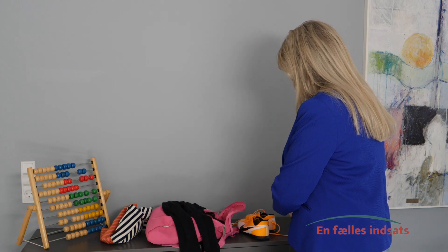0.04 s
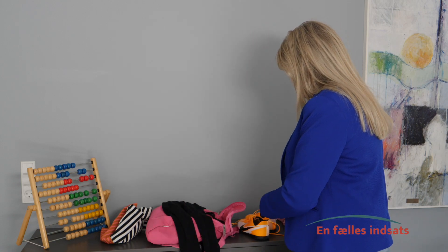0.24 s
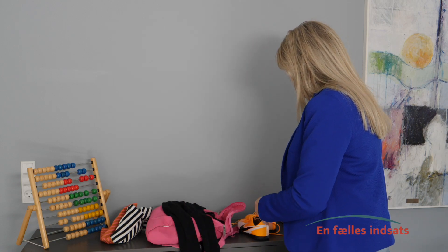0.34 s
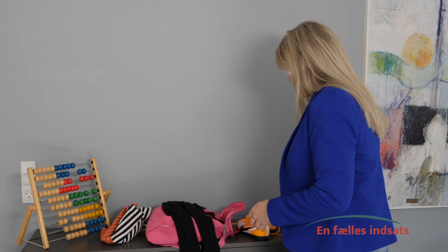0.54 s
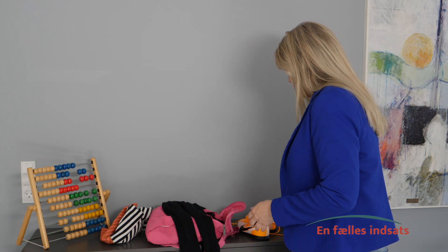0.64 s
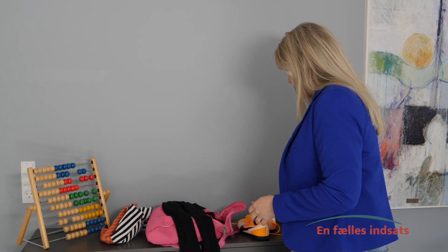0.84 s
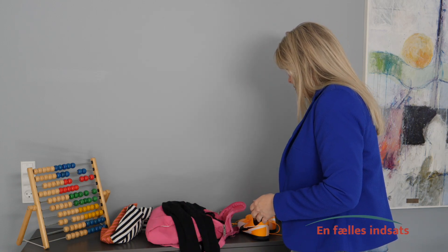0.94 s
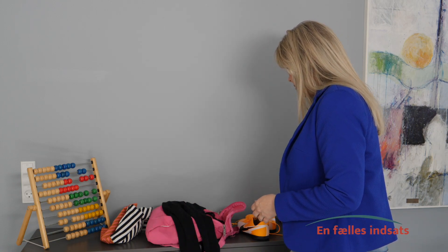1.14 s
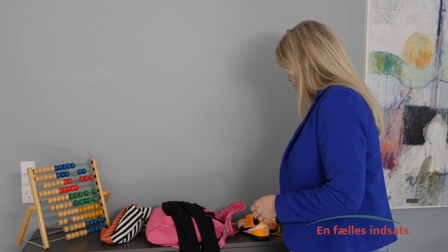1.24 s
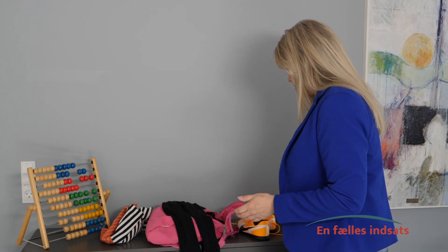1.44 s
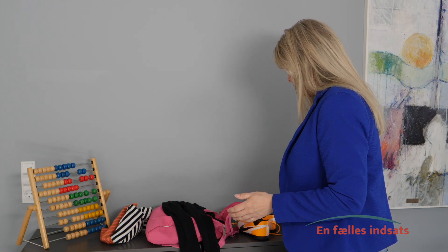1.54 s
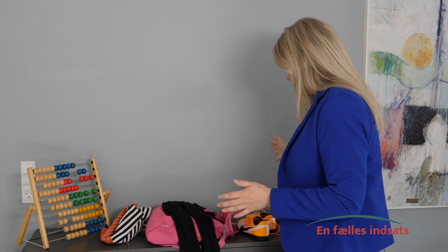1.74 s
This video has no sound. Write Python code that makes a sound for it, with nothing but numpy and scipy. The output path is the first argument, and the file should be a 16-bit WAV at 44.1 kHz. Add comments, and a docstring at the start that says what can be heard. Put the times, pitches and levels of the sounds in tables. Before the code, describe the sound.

Small shoes are put down on a wooden table: a short scuff and sharp knock, then a duller, quieter thump that settles, and finally a faint click, heard close in a quiet small room.

```python
"""Shoes on a table

Two small shoes are put down on a wooden table in a quiet room. The first scuffs in and lands with a knock;
the second rolls onto its sole with a soft thump and settles. The hand lets go with a faint click.
Knocks ring decaying tones, clicks are pulses with short noise, scuffs and rustling sleeves are shaped noise.
Fading noise makes the room's brief echoes; steady noise makes a low rumble and a faint hiss."""
import sys
import numpy as np
from scipy import signal
from scipy.fft import rfft, irfft
from scipy.io import wavfile

SR = 44100
rng = np.random.default_rng(int(sys.argv[2]) if len(sys.argv) > 2 else 0)


def waveform_to_disk(signal):
    """Save audio, clipped to [-1, 1], as 16-bit WAV at the path in sys.argv[1]."""
    frames = np.transpose(np.atleast_2d(signal))
    scaled = np.clip(frames, -1, 1) * 32767
    samples = np.round(scaled).astype(np.int16)
    wavfile.write(sys.argv[1], SR, samples)


N = 79380
TIME_S = np.arange(N) / SR
FREQS_HZ = np.fft.rfftfreq(N, 1 / SR)


def undb(db):
    """Turn decibels into a gain."""
    return 10 ** (np.asarray(db) / 20)


def unit(x):
    """Scale a sound to an rms (average strength) of 1."""
    return x / np.sqrt(np.mean(x ** 2))


def lookup(points, hz):
    """Read between (f/Hz, value) points, with frequency on a logarithmic axis."""
    point_hz, values = np.array(points, float).T
    return np.interp(np.log(np.maximum(hz, 1)), np.log(point_hz), values)


def noise(colour):
    """Make noise of rms 1 whose spectrum follows the given colour."""
    spectrum = rfft(rng.standard_normal(N))
    return unit(irfft(spectrum * undb(lookup(colour, FREQS_HZ)), N))


def fade(start_s, t60_s):
    """Start suddenly, then die away by 60 dB in every t60."""
    age_s = TIME_S - start_s
    return (age_s >= 0) * np.exp(-np.log(1000) * np.maximum(age_s, 0) / t60_s)


def soften(x, cutoff_hz):
    """A yielding contact dulls the sound: two gentle low-pass filters in a row."""
    p = np.exp(-2 * np.pi * cutoff_hz / SR)
    return signal.lfilter([(1 - p) ** 2], [1, -2 * p, p * p], x)


def snap(colour):
    """One sharp pulse with the given spectrum and nothing before its start (minimum phase)."""
    cepstrum = irfft(np.log(undb(lookup(colour, FREQS_HZ))), N)
    # keep only the first half, so that the energy comes as early as possible
    one_sided = 2 * cepstrum * (np.arange(N) < N // 2)
    return irfft(np.exp(rfft(one_sided)), N)


# ringing tones of the table: f/Hz, t60/s, then relative level/dB when struck at each of the three SPOTS
TABLE_MODES = [(63.9, 0.36, -2, 0, -23), (74, 0.11, 0.5, 11, -20), (95.9, 0.22, 3, -38, 10.5),
               (130.9, 0.43, -12, -19, -12), (149.5, 0.43, -9, -5.5, -35), (191, 0.14, -2, -4.5, 4.5),
               (227.3, 0.18, -6.5, -20, -0.5), (280, 0.037, 4, -37, -8), (328, 0.12, -9, -37, -20),
               (416.7, 0.21, -6, -31, -6), (437.6, 0.28, -40, -11.5, -15.5), (589, 0.18, -4.5, -11, -9),
               (651, 0.21, -8, -25, -24), (687, 0.23, -12, -14, -17), (779, 0.29, -18.5, -16, -29),
               (861, 0.079, -5, -28, 0), (907, 0.054, -4, -34, -21)]
SPOTS = ("knock", "thump", "settle")
# blows of the soles on the table: t/s, relative level/dB, contact cut-off f/Hz, spot
BLOWS = [(0.169, -50, 593, "knock"), (0.185, -39, 131, "knock"), (0.2351, -36.5, 1286, "knock"),
         (0.2483, -22.5, 1560, "knock"), (.911, -38, 730, "thump"), (.9175, -29.5, 217, "thump"),
         (0.9276, -27, 180, "thump"), (0.9401, -29.5, 280, "thump"), (0.973, -40.5, 317, "settle"),
         (1.018, -41.5, 340, "settle"), (1.043, -43, 596, "settle"), (1.075, -47.5, 222, "settle"),
         (1.433, -44.5, 128, "thump")]
# colour of the many weak, close tones of the boards: f/Hz, relative level/dB per Hz
BOARD_COLOUR = [(60, -19), (140, -11), (270, 4), (480, -2.5), (640, -4), (780, 0), (920, 1.5), (1060, -11),
                (1400, -8.5), (1700, -7), (1900, -41), (5000, -28.5)]
BOARDS_DB, BOARDS_T60_S = -0.5, 0.13
THUD_DB = 6.5  # peak of the thud before softening and the blow's level
RADIATES_HZ = 48  # below this the tabletop moves little air


def table():
    """Each blow thuds and rings the table's tones; a softer contact leaves mostly the low ones."""
    out = np.zeros(N)
    thud = snap(BOARD_COLOUR)
    thud = undb(THUD_DB) * thud / np.abs(thud).max()
    modes = []
    for k, (hz, t60_s, *levels_db) in enumerate(TABLE_MODES):
        direction = (-1) ** k  # neighbouring tones start in opposite directions
        wave = direction * np.sin(2 * np.pi * hz * TIME_S) * fade(0, t60_s)
        modes.append((wave, levels_db))
    for start_s, db, contact_hz, spot in BLOWS:
        column = SPOTS.index(spot)
        ring = sum(undb(levels_db[column]) * wave for wave, levels_db in modes)
        boards = undb(BOARDS_DB) * noise(BOARD_COLOUR) * fade(0, BOARDS_T60_S)
        blow = soften(ring + thud + boards, contact_hz)
        # shift the blow to its start time
        out += undb(db) * np.interp(TIME_S - start_s, TIME_S, blow, left=0)
    high_pass = signal.butter(2, RADIATES_HZ, "high", fs=SR, output="sos")
    return signal.sosfilt(high_pass, out)


# clicks from hard parts of the shoes:
# t/s, snap peak level/dB, rattle starting level/dB, rattle t60/s, brightness cut-off f/Hz
CLICKS = [(0.0754, -60, -52, 0.024, 3130), (0.1702, -56, -55.5, 0.053, 3000),
          (0.2457, -23.5, -35.5, 0.056, 6800), (0.2495, -24, -36.5, 0.05, 5550),
          (.601, -48, -55, 0.027, 2000), (0.9093, -36, -50, 0.023, 3800),
          (0.9363, -46, -48.5, 0.0097, 2800), (1.4225, -39, -52.5, 0.015, 5030),
          (1.4333, -34, -50.5, 0.016, 2500)]
# colour of the clicks before softening: f/Hz, relative level/dB per Hz
CLICK_COLOUR = [(300, -13), (1000, 2), (1500, -4), (2200, -8), (2800, -3), (3500, -3), (4600, 0),
                (5900, -18.5), (6900, -8), (8000, -18.5), (10500, -29.5), (12500, -14), (15500, -15)]


def clicks():
    """Hard edges meet: a sharp snap and a short, noisy rattle that dies away."""
    pulse, out = snap(CLICK_COLOUR), np.zeros(N)
    for start_s, snap_db, rattle_db, t60_s, cutoff_hz in CLICKS:
        edge = soften(pulse, cutoff_hz)
        edge = edge / np.abs(edge).max()
        # the mask removes any end of the pulse that wraps round to the beginning
        out += undb(snap_db) * np.roll(edge, round(start_s * SR)) * (TIME_S >= start_s)
        rattle = unit(soften(noise(CLICK_COLOUR), cutoff_hz))
        out += undb(rattle_db) * rattle * fade(start_s, t60_s)
    return out


GRAIN_HZ, GRAIN_DB = 506, -1  # new random grip values per second, and their typical size (sign is free)


def friction(strokes, colour):
    """Rubbing noise swells and dies away while tiny catches make its strength flicker."""
    effort = np.zeros(N)
    for peak_s, db, rise_s, fall_s in strokes:
        # distance from the peak, in steps of 20 dB
        away = np.maximum((peak_s - TIME_S) / rise_s, (TIME_S - peak_s) / fall_s)
        effort += undb(db - 20 * away)
    grip = np.interp(TIME_S * GRAIN_HZ, np.arange(N), rng.standard_normal(N))
    catches = undb(GRAIN_DB * grip)
    return effort * unit(catches * noise(colour))


# strokes of the soles on wood: peak t/s, level/dB at the peak, rise t/s per 20 dB, fall t/s per 20 dB
SCUFFS = [(.205, -56.5, .04, .05), (.237, -37.5, 0.044, 0.065), (.908, -41, 0.013, 0.085),
          (.936, -56.5, 0.0069, 0.047), (1.045, -72, 0.01, 0.049)]
# colour of the scuffs: f/Hz, relative level/dB per Hz
SCUFF_COLOUR = [(80, -2), (170, 7), (500, -2), (1000, -1), (2200, -13), (4500, -23.5), (7000, -34.5),
                (15000, -48)]


def scuffs():
    """The soles rub on the wood, giving mostly low and middle noise."""
    return friction(SCUFFS, SCUFF_COLOUR)


# sleeve and fingers rubbing on cloth: peak t/s, level/dB at the peak, rise t/s per 20 dB, fall t/s per 20 dB
RUSTLES = [(.065, -57.5, 0.2, 0.12), (.208, -53.5, 0.043, 0.059), (.262, -55, 0.027, 0.048),
           (.905, -48, 0.013, 0.041), (1.388, -57, 0.031, 0.095)]
# colour of the rustles: f/Hz, relative level/dB per Hz
RUSTLE_COLOUR = [(150, 13), (400, 7), (1200, 2.5), (2200, 5.5), (3500, -7.5), (5000, -3), (8000, -14.5),
                 (15000, -24.5)]


def rustles():
    """Sleeve and fingers rub on cloth, giving noise with more treble than the scuffs."""
    return friction(RUSTLES, RUSTLE_COLOUR)


# how long the room's echoes last: f/Hz, t60/s
ROOM_T60 = [(100, 0.7), (400, 0.41), (1000, 0.3), (2000, .5), (4000, 0.447), (8000, 0.65), (14000, 3.1)]
# colour of the echoes before they fade: f/Hz, relative level/dB per Hz
ROOM_COLOUR = [(60, -14), (130, -4), (300, -1.5), (800, -5), (2200, -3), (4000, -3), (8000, -4.5),
               (15000, -11)]
ROOM_DB, ROOM_DELAY_S = -8.5, 0.0079


def room(x):
    """Dense echoes of a small room, with a decay time for each octave."""
    echoes, tail = rfft(noise(ROOM_COLOUR)), np.zeros(N)
    for centre_hz in 31.25 * 2. ** np.arange(10):
        # each band fades out towards the centres of its neighbours
        octaves_away = np.abs(np.log2(np.maximum(FREQS_HZ, 1) / centre_hz))
        share = np.maximum(1 - octaves_away, 0)
        tail += irfft(echoes * share, N) * fade(ROOM_DELAY_S, lookup(ROOM_T60, centre_hz))
    tail = tail / np.sqrt(np.sum(tail ** 2))  # total energy 1
    return undb(ROOM_DB) * signal.fftconvolve(x, tail)[:N]


# colour of the room's still air: f/Hz, relative level/dB per Hz
AIR_COLOUR = [(20, -13), (35, -2), (55, -1.5), (100, -4.5), (140, -12.5), (250, -18), (450, -23),
              (900, -22.5), (2000, -34.5), (4000, -40.5), (8000, -44.5), (15000, -51)]
# colour of the faint hiss: f/Hz, relative level/dB per Hz
HISS_COLOUR = [(30, -1), (140, -4), (450, 0), (800, -7), (2400, -5.5), (15000, -0.5)]
AIR_DB, HISS_DB = -58.5, -72.5  # rms levels


def air():
    """Steady noise: a low rumble shared by both channels and a faint hiss of its own in each."""
    rumble = undb(AIR_DB) * noise(AIR_COLOUR)
    hiss = undb(HISS_DB) * np.array([noise(HISS_COLOUR), noise(HISS_COLOUR)])
    return rumble + hiss


def scene():
    """Shoes, table and sleeves in the room, all heard from one point."""
    near = table() + clicks() + scuffs() + rustles()
    return near + room(near) + air()


TOP_HZ = 15650


def record(dry):
    """A steep low-pass filter removes the highest treble."""
    low_pass = signal.ellip(10, .1, 80, TOP_HZ, fs=SR, output="sos")
    return signal.sosfilt(low_pass, dry)


dry = scene()
out = record(dry)
waveform_to_disk(out)
```